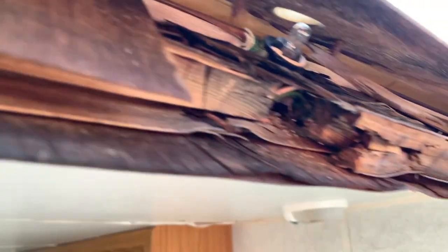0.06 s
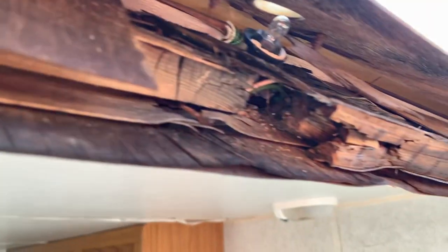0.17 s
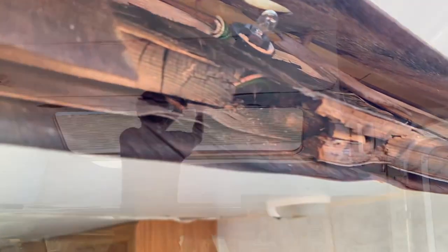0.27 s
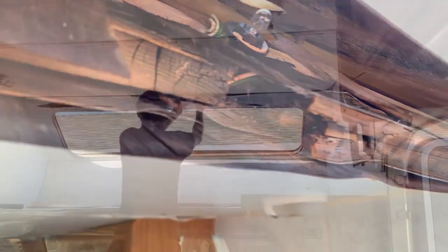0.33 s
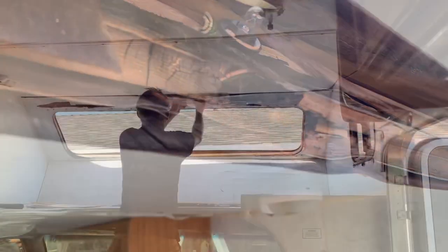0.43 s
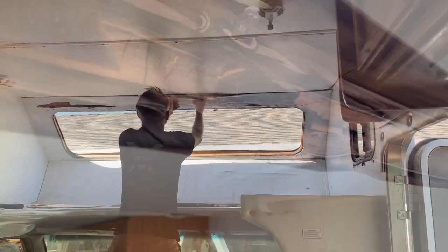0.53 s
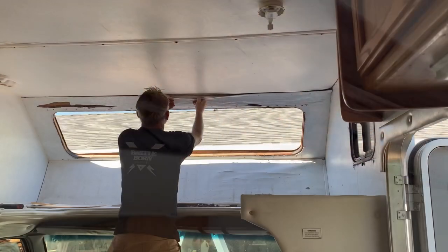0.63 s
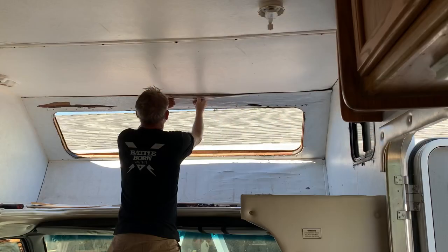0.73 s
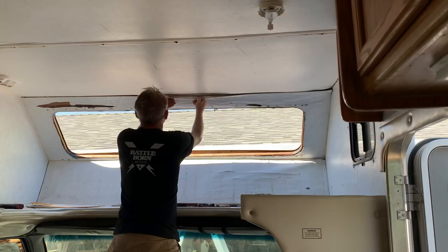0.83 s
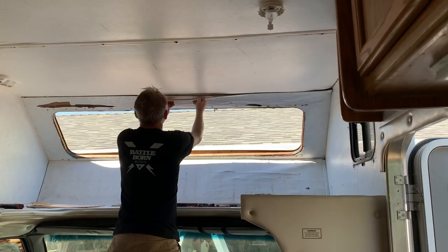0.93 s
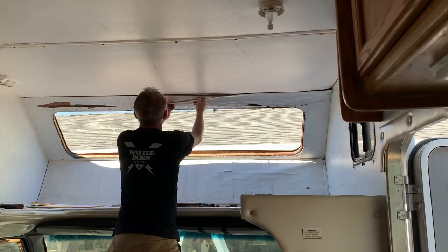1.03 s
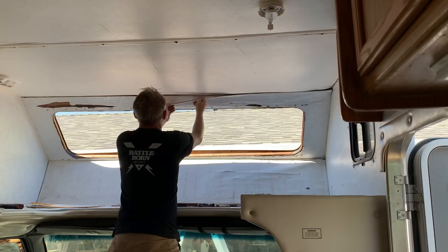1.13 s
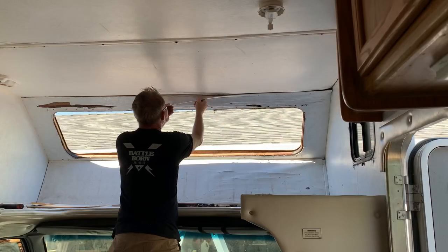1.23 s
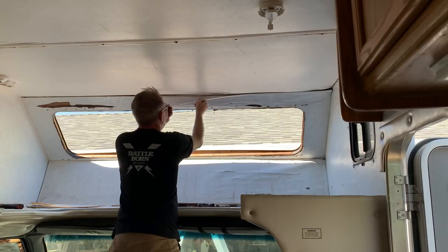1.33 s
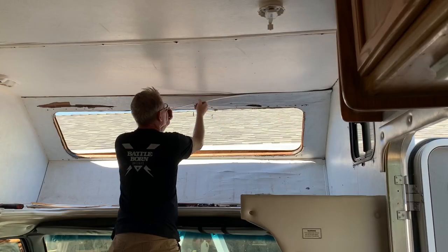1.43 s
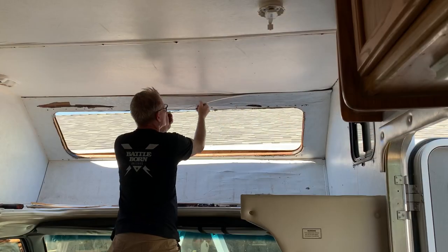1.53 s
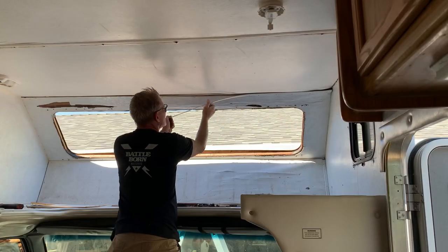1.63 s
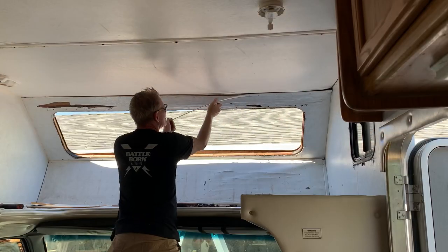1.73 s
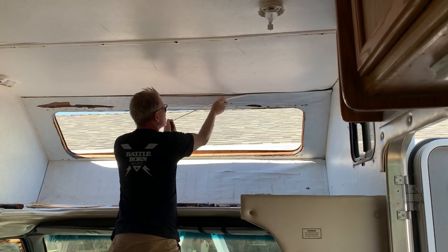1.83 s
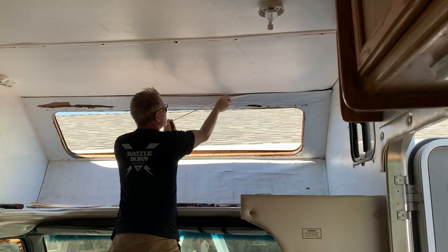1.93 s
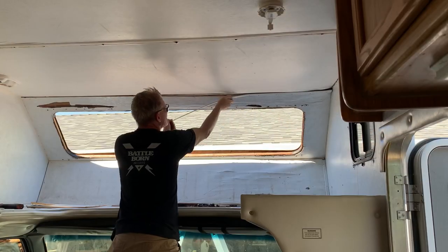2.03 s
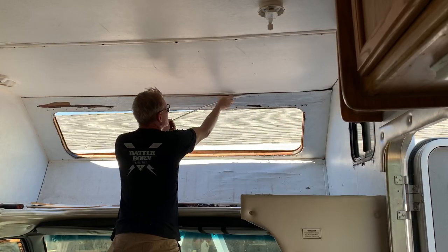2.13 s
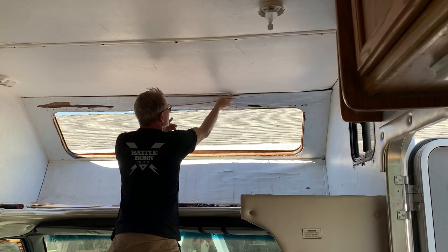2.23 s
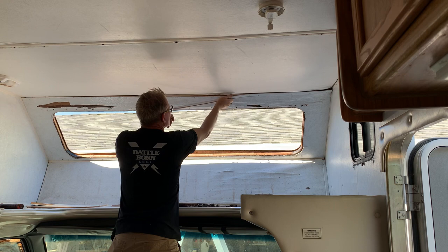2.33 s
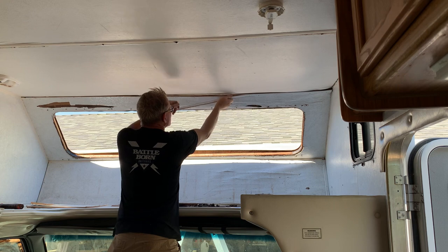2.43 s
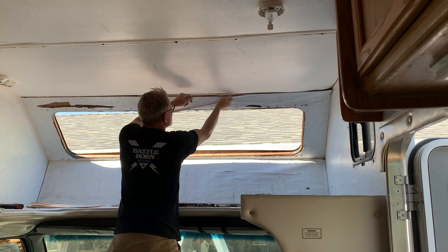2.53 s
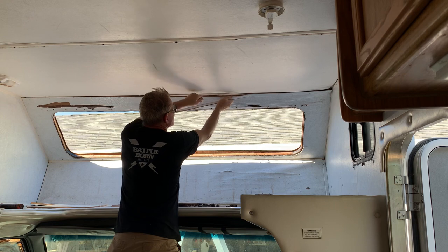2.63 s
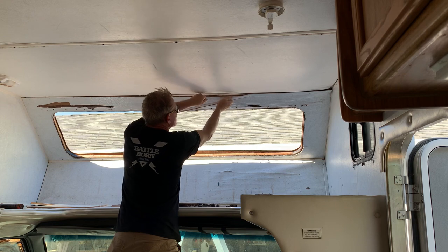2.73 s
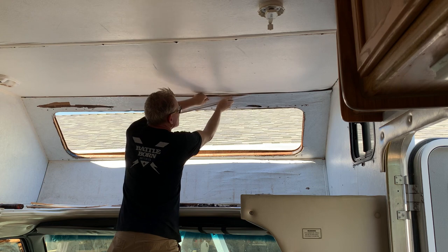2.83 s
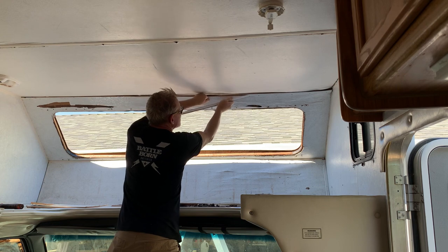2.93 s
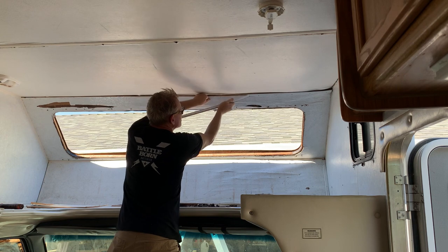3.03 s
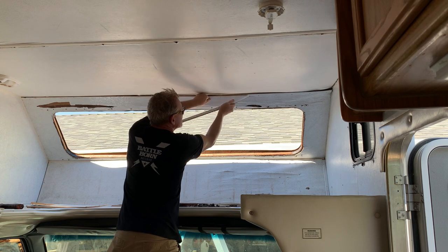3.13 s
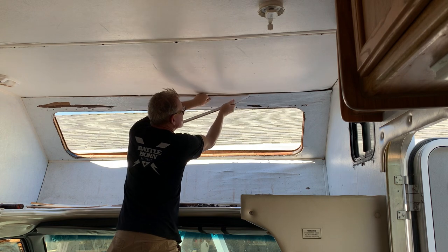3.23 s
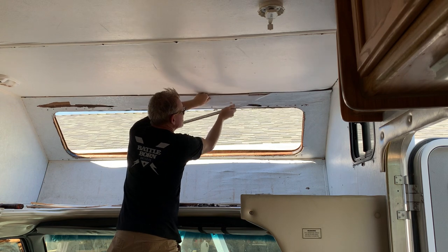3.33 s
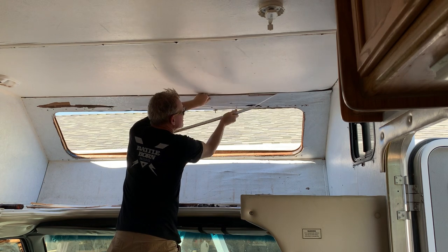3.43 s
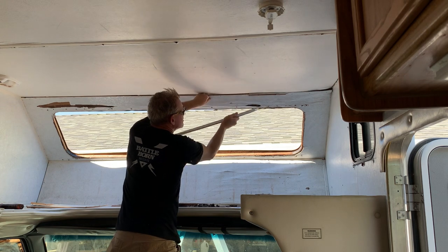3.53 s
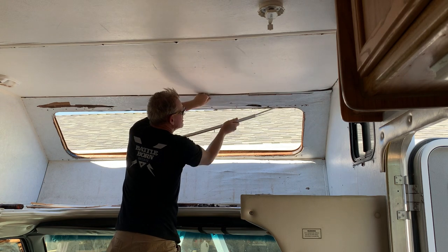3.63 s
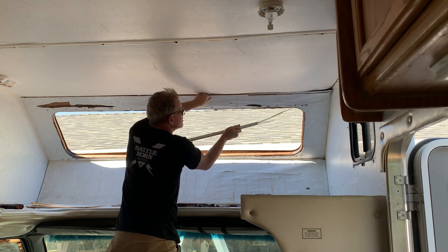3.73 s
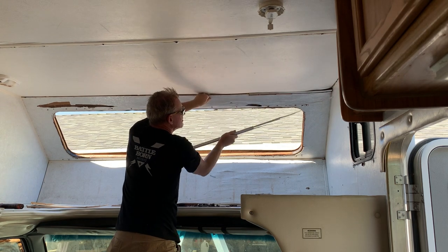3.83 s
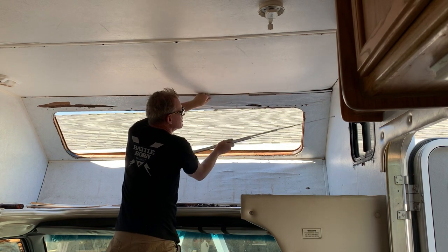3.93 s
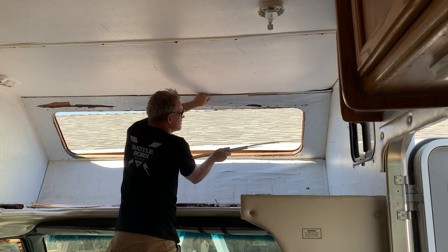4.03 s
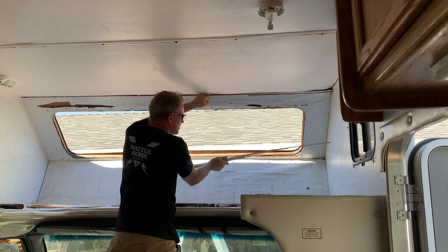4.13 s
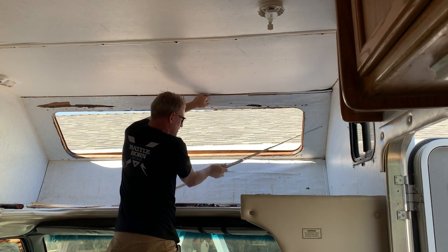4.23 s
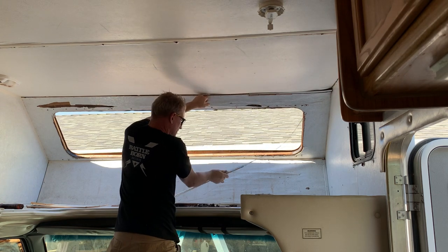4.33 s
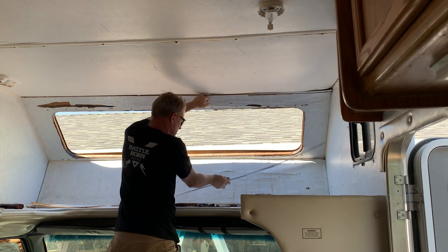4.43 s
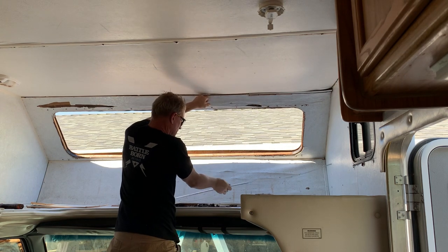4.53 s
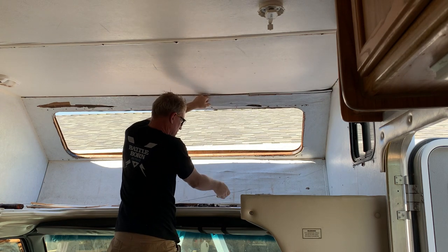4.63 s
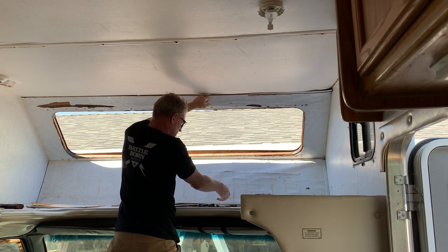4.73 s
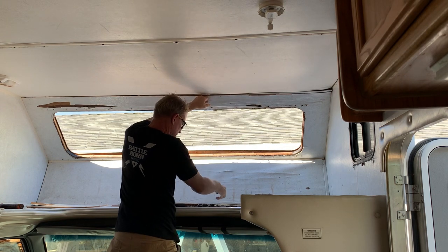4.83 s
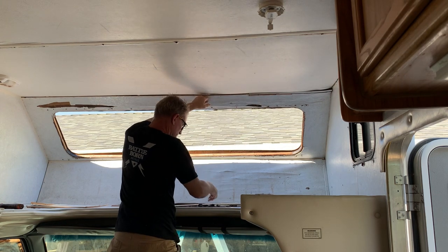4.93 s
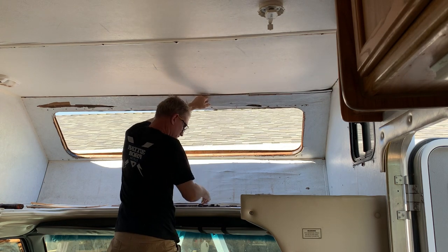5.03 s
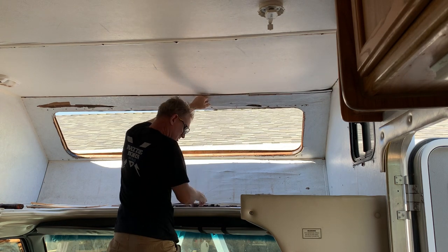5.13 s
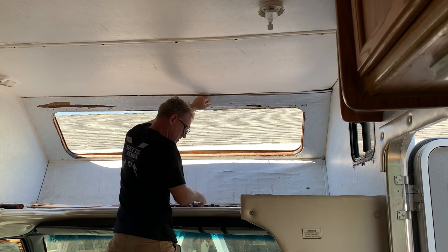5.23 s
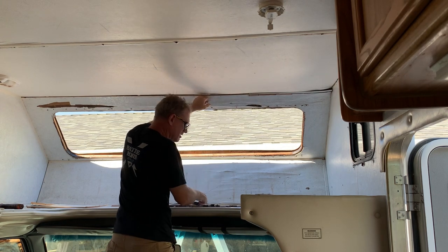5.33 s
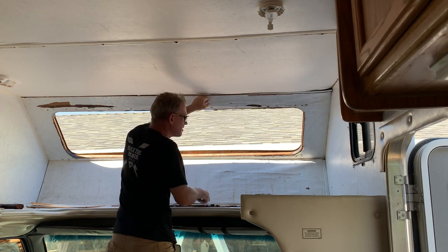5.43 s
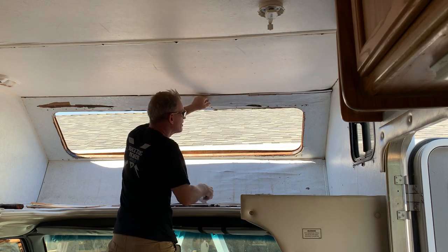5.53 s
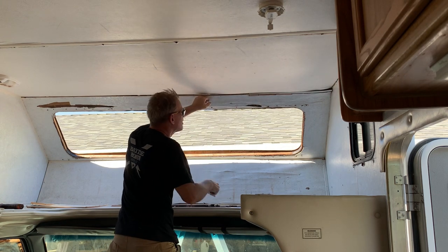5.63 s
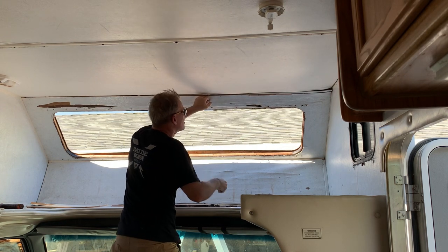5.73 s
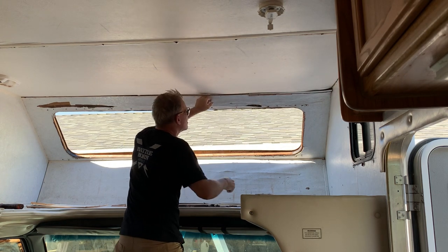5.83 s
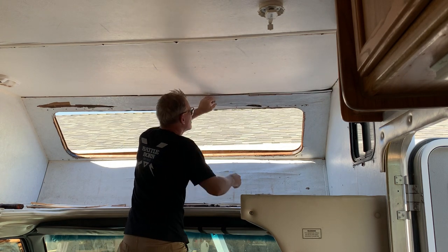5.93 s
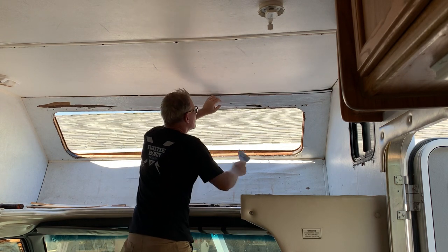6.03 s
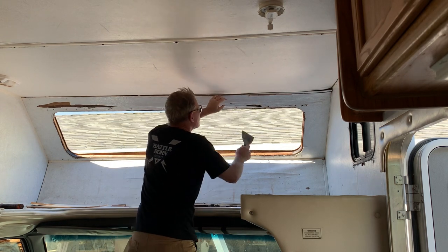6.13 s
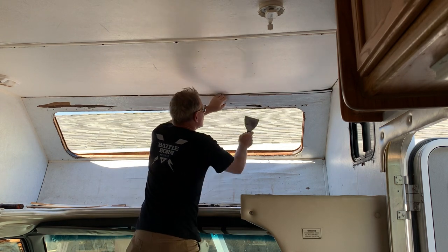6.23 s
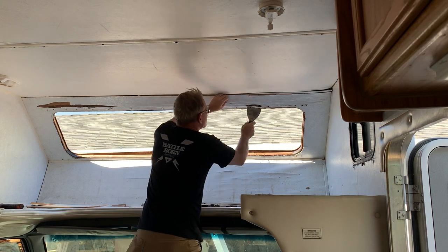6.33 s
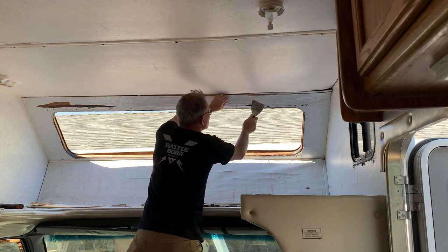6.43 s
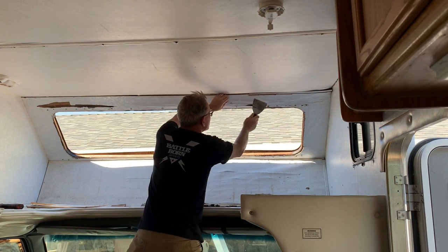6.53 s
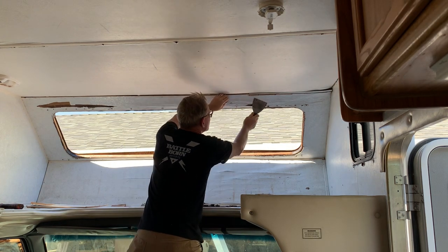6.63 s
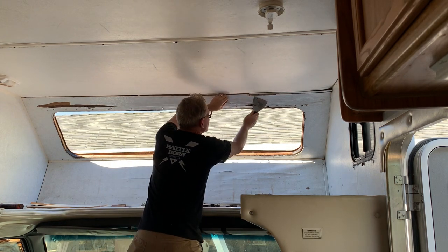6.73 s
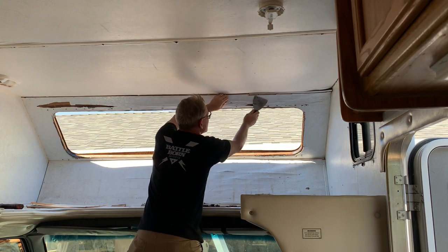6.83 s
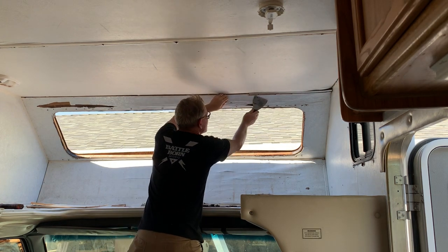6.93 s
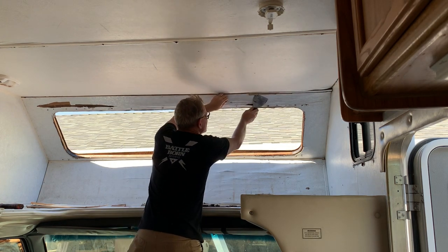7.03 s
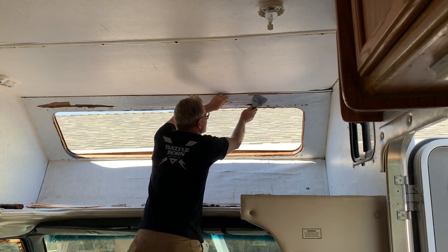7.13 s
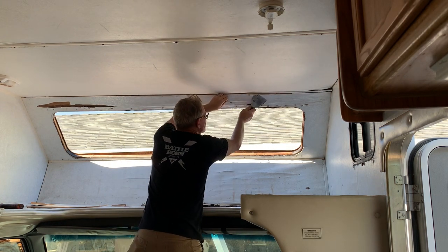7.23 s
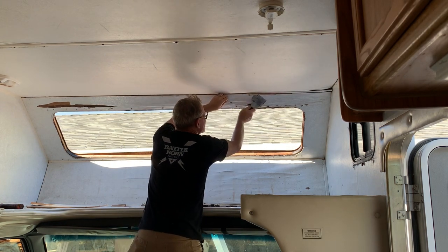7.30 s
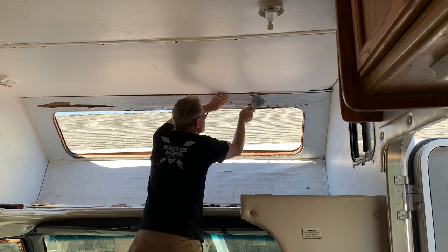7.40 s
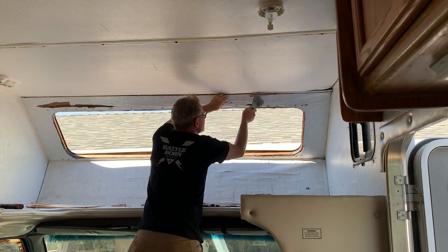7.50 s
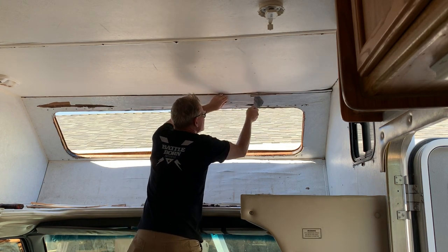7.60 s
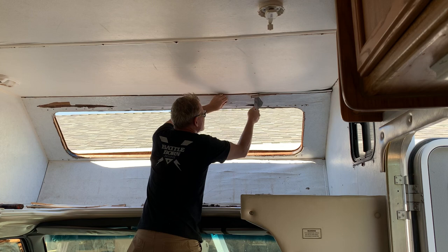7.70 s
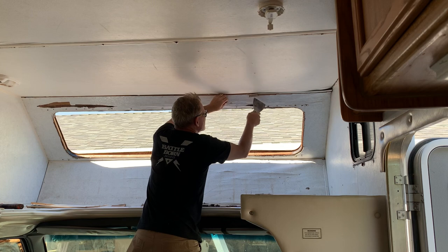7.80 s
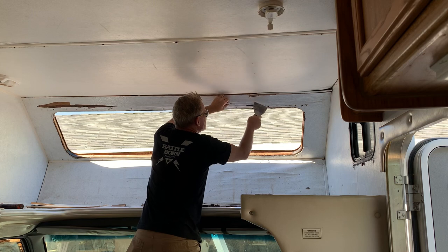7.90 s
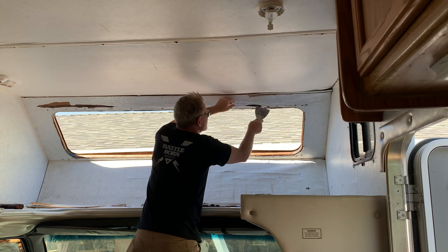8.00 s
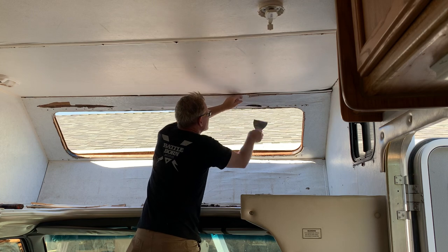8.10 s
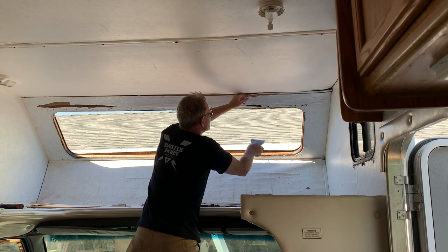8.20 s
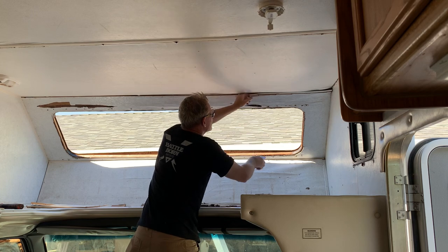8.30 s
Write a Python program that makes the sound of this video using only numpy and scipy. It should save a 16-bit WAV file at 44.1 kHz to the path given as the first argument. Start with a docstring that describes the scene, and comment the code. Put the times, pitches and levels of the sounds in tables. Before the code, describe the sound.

A small camper cabin with short, dry reverberation and a very faint outdoor hush; the work is a few metres away. A soft rubbing and fading sizzle open, with a tiny tick at 0.3 s and a dry low blip at 0.5. At 0.87 a sharp splintering crack jumps out with a hollow boom. Quiet rubbing, small ticks and a light knock follow until 2.9. At 3.0 comes the brightest, loudest snap, then from 3.25 to 3.8 crunchy tearing in uneven bursts, the roof panel booming deeply. From 3.9 to 5.0 the loose strip knocks and clatters lightly, with a barely audible squeak near 4.5. Around 5.1-5.4 a blade scrapes briefly. Near quiet lasts until 6.4; rubbing and hollow bumps grow to 7.05. From 7.3 to 7.75 softer crackling prying bursts with low thuds, then a light knock and fading rub to 8.4.

```python
"""Tearing rotten wood out of a camper van

Rotten wooden framing is torn from the ceiling, a few metres from the microphone. Random trains of snaps, shaped
by spectra and damped modes, make fibres that break singly and in runs; the roof panel booms when it lets go.
The loose strip is laid on a shelf, a putty knife is slid off it and pries out more wood. Hands and blade rub
along the frame; a dry blip, a squeak, a sizzle and a faint hush join in. The small cabin rings briefly."""
import sys
import numpy as np
from scipy import signal
from scipy.fft import rfft, irfft
from scipy.io import wavfile
from scipy.ndimage import uniform_filter1d

SR = 44100
rng = np.random.default_rng(int(sys.argv[2]) if len(sys.argv) > 2 else 0)


def wav_out(sig):
    """Save sig, one row per channel (or a flat mono array), as 16-bit PCM at SR to the path in sys.argv[1]."""
    wavfile.write(sys.argv[1], SR, np.round(np.clip(np.atleast_2d(sig).T, -1, 1) * 32767).astype(np.int16))


N = 368676
TIME = np.arange(N) / SR

# Event levels are relative: each layer trims them again.
# splintering cracks, with a sharp tick of the strip (at 4.811 s) and a click of the knife (at 5.225 s):
# start_s, treble_db, wood_body_db
CRACKS = [(0.2941, -47, -57), (0.784, -55, -43), (0.8606, -24.5, -30.5), (0.8716, -21, -27),
          (0.879, -15.5, -24.5), (1.274, -43.5, -46), (1.486, -59, -74.5), (1.947, -59.5, -78.5),
          (2.2506, -47, -53), (2.7291, -50, -67), (2.9573, -25.5, -47.5), (2.9965, -9, -27.5),
          (3.149, -44.5, -58), (3.253, -20.5, -34.5), (3.2629, -25, -26.5), (3.4865, -36, -50),
          (3.612, -36.5, -40), (3.6752, -25, -40), (3.7431, -23.5, -32.5), (4.061, -46.5, -66),
          (4.2416, -53, -67), (4.811, -38, -58), (5.225, -55.5, -64), (6.6733, -51, -73),
          (7.3448, -28.5, -36.5), (7.3668, -20.5, -46), (7.466, -30, -60), (7.493, -25, -32.5),
          (7.5753, -33.5, -65), (7.608, -27.5, -48), (7.6315, -30.5, -45)]
# steady tearing pulls: start_s, length_s, fibre_db, wood_body_db, sag_db_per_s
TEARS = [(0.872, 0.037, -25, -38.5, 178), (2.93, 0.068, -43, -51.5, -140), (3.255, .15, -23, -35.5, 63),
         (3.5, 0.19, -30, -39.5, -1.5), (3.746, 0.049, -61, -42, 127), (7.336, 0.14, -38.5, -47.5, 48),
         (7.5, 0.25, -36, -44, 153), (7.725, 0.024, -46.5, -43, 64)]
# knocks of the strip and the knife: start_s, ring_db, tick_db, hollow_thud_db, ring_centre_hz
KNOCKS = [(0.617, -79, -78, -46, 517), (1.808, -41, -43, -63.5, 970), (3.939, -45.5, -50.5, -95, 1040),
          (4.281, -39, -53, -39.5, 830), (4.606, -57.5, -76, -52.5, 764), (4.722, -46.5, -56.5, -51.5, 993),
          (4.781, -32.5, -61, -72, 720), (4.811, -39.5, -68, -56, 1070), (4.865, -46, -62, -63, 1220),
          (4.923, -44.5, -65.5, -53, 840), (5.065, -49, -78, -57.5, 750), (6.597, -47.5, -63, -60, 1230),
          (7.829, -47.5, -63.5, -61.5, 1050)]
# pushes of the knife over the shelf: start_s, length_s, ring_db, scratch_db, sag_db_per_s
SLIDES = [(5.07, 0.028, -56, -67.5, 0), (5.145, 0.012, -52.5, -64, 2), (5.226, 0.15, -55.5, -57, 26)]
# hands and blade rubbing along the frame: hardest_moment_s, swell_s, fade_s (each over 20 dB), friction_db, grit_db
RUBS = [(0.005, 0.04, 0.017, -52, -71), (0.23, 0.18, 0.45, -66, -67.5), (0.4, 0.066, 0.088, -76, -81),
        (0.51, 0.022, 0.056, -79.5, -63), (0.58, 0.027, 0.18, -64, -66), (0.78, 0.078, .05, -65, -56.5),
        (1.169, 0.22, 0.18, -66, -64), (1.29, 0.12, 0.099, -51.5, -60), (2.254, 0.12, 0.15, -56, -58),
        (2.82, 0.092, 0.073, -58.5, -60), (3.87, 0.056, 0.36, -64, -61), (4.13, .1, 0.055, -69, -71.5),
        (4.289, 0.031, 0.059, -50, -59), (4.76, 0.053, 0.19, -50.5, -50), (6.41, 0.15, 0.064, -59, -58.5),
        (6.779, 0.21, 0.029, -53.5, -59), (7.05, 0.16, 0.095, -46, -52), (7.87, .1, 0.13, -61.5, -70),
        (8.14, 0.022, 0.27, -66.5, -65.5)]
# shoves that set the roof panel booming: start_s, level_db
BOOMS = [(0.899, -23), (1.293, -49), (2.258, -51), (2.892, -50), (3.019, -39), (3.267, -18.5),
         (3.336, -22.5), (3.609, -24.5), (3.752, -25), (4.281, -39), (4.761, -41.5), (4.939, -47.5),
         (6.255, -48), (6.795, -36.5), (7.017, -28.5), (7.392, -34.5), (7.498, -22.5), (7.81, -45)]
# the worker's weight shifts and the van's shell rumbles: start_s, length_s, level_db, sag_db_per_s
LEANS = [(0.0, .75, -57.5, 6), (1.0, 0.11, -57.5, 17), (2.3, .85, -59.5, -7.5), (5.05, 0.25, -61, 9),
         (6.3, 0.5, -65, 0.5), (8.25, .11, -61, -0.5)]

# resonances of the beam behind the fibres: pitch_hz, width_hz, level_db
BEAM = [(254, 38, -1), (330, 16, -3.5), (505, 25, -2.5), (509, 57, -1), (1000, 37, -2.5), (1187, 19, 0),
        (1990, 70, -13.5), (2371, 100, 4)]
# resonances of the loose wooden strip: pitch_hz, width_hz, level_db
STRIP = [(693, 17, -8.5), (819, 63, -1.5), (987, 51, 0.5), (1222, 110, -1.5), (1472, 170, 1),
         (2140, 540, -1.5), (2290, 8.2, -23.5)]
# resonances of the knife blade: pitch_hz, width_hz, level_db
KNIFE = [(779, 28, -1.5), (1010, 42, -3.5), (1253, 140, -2), (2374, 3000, -10.5), (4260, 210, -4.5),
         (4840, 790, -4)]
# resonances of the roof panel: pitch_hz, width_hz, level_db
PANEL = [(57.4, 3.6, -0.5), (84.4, 33, 0), (103.14, 9.9, -7.5), (118.4, 3.8, -5.5), (143, 23, -4.5),
         (195, 40, -10), (264, 53, -7.5)]

# spectrum of snapping fibres: frequency_hz, relative_level_db
FIBRE = [(300, -26), (1500, -6.5), (3100, -8), (4800, -5), (6600, -3.5), (7700, -6), (9000, 1.5),
         (10500, -4), (12500, -4.5), (16000, -6.5)]
# spectrum of the wood body: frequency_hz, relative_level_db
WOOD = [(70, -20), (130, -3.5), (230, -5), (370, -4), (570, 5.5), (780, -2.5), (1300, -1), (2300, -6.5),
        (3200, -7), (6000, -18), (16000, -45)]
# spectrum of a hollow thud: frequency_hz, relative_level_db
THUD = [(50, -21.5), (120, -4), (230, 0), (380, -15), (560, 2), (800, -14.5), (4000, -49)]
# spectrum of the blade scratching the shelf: frequency_hz, relative_level_db
SCRATCH = [(700, -31), (2500, 0), (5000, -4.5), (7500, -10), (10000, -4), (14500, -8), (16000, -4)]
# spectrum of rubbing friction: frequency_hz, relative_level_db
FRICTION = [(60, -7.5), (150, 5), (300, -4), (600, -2.5), (1200, 0), (2200, -16), (5000, -23), (16000, -40)]
# spectrum of crumbling grit and hard ticks: frequency_hz, relative_level_db
GRIT = [(500, -16.5), (2000, 2), (4200, 0.5), (7000, -4), (11000, -9), (16000, -12)]
# spectrum of the outdoor hush: frequency_hz, relative_level_db
AMBIENCE = [(20, -9), (45, 2), (65, -8.5), (110, -6), (170, -16.5), (400, -20), (1200, -20.5), (3000, -29),
            (8000, -33), (16000, -34.5)]
# cabin reverberation: frequency_hz, t60_s
CABIN = [(150, 0.23), (700, 0.17), (2000, 0.19), (5000, 0.21), (13000, 0.17)]

RUN_S, BIG_RUN_S = 0.0042, 0.02  # decay of the snaps after a tiny crack, and what a 0 dB break adds to it
PULL_ATTACK_S, PULL_RELEASE_S = 0.027, 0.027  # a pull comes up and dies away by 20 dB in these times
TOP_HZ = 15700  # the sound is cut above this


def splintering(tearing, crack_db=-4, crack_body_db=-3, tear_db=-3, tear_body_db=-2, beam_db=-4):
    """Fibres (and two sharp clicks) snap brightly and ring the beam; in a tear they give way bundle by bundle."""
    start_s, treble_db, body_db = np.transpose(CRACKS)
    run_s = RUN_S + BIG_RUN_S * undb(treble_db)  # bigger breaks run on for longer
    fibre_gain, body_gain = tearing

    # the strength of the bundles drifts at random from one 9 ms point to the next
    knots = np.arange(0, N / SR, 0.009)
    bundles = undb(np.interp(TIME, knots, rng.uniform(-5.95, 4.55, len(knots))))
    fine = snaps(rate=1500, spread_db=5, even_s=0.02) * bundles * fibre_gain
    coarse = snaps(rate=500, spread_db=5, even_s=0.025) * bundles * body_gain

    fibres = bursts(start_s, treble_db + crack_db, run_s, rate=3800, first=0.42)
    fibres = fibres + undb(tear_db) * fine
    body = bursts(start_s, body_db + crack_body_db, run_s * 0.9, rate=2500, first=0.2)
    body = body + undb(tear_body_db) * coarse
    return colour(fibres, FIBRE) + colour(body, WOOD) + undb(beam_db) * ring(body, BEAM)


def knocking(ring_db=-2, tick_db=-3.5, thud_db=-1, chatter_s=0.0024, focus_db_per_octave=8, edge_db=-17):
    """The strip or the knife lands, chatters and thuds on the panelling; all knocks ring the strip's modes."""
    start_s, rings_db, ticks_db, thuds_db, centres_hz = np.transpose(KNOCKS)
    chatter = np.full(len(start_s), chatter_s)
    contacts = bursts(start_s, rings_db + ring_db, chatter, rate=1500, first=0.83)

    wood = 0
    for at, centre in zip(start_s, centres_hz):
        # the point that is struck favours the modes near one pitch
        modes = [(hz, width, db - focus_db_per_octave * abs(np.log2(hz / centre))) for hz, width, db in STRIP]
        this_knock = np.abs(TIME - at) < 0.015
        wood = wood + ring(contacts * this_knock, modes)

    ticks = bursts(start_s, ticks_db + tick_db, chatter, rate=3000, first=0.17)
    ticks = ticks + undb(edge_db) * contacts
    thuds = bursts(start_s, thuds_db + thud_db, chatter * 2, rate=4800, first=1)
    return wood + colour(ticks, GRIT) + colour(thuds, THUD)


def sliding_knife(ring_db=0, scratch_db=-1, rise_s=0.03, fall_s=0.069):
    """The knife is dragged off the shelf; small slips ring the blade and scratch the surface."""
    ring_gain, scratch_gain = pulls(SLIDES, rise_s, fall_s)
    slips = snaps(rate=700, spread_db=6, even_s=0.05)
    blade = ring(slips * ring_gain, KNIFE)
    scratch = colour(slips * scratch_gain, SCRATCH)
    return undb(ring_db) * blade + undb(scratch_db) * scratch


def rubbing(pressure, friction_db=-3, grit_db=-3, hollow_db=0, hard_db=-45, hollow_growth=0.96):
    """Stick-slip of hands and blade and crumbling grit; harder rubs bring in more of the hollow panel."""
    friction_gain, grit_gain = pressure
    hollow_gain = friction_gain * (friction_gain / undb(hard_db)) ** hollow_growth
    friction = colour(snaps(rate=700, spread_db=9.5) * friction_gain, FRICTION)
    grit = colour(snaps(rate=1800, spread_db=5) * grit_gain, GRIT)
    hollow = colour(snaps(rate=550, spread_db=5) * hollow_gain, THUD)
    return undb(friction_db) * friction + undb(grit_db) * grit + undb(hollow_db) * hollow


def roof(tearing, pressure, boom_db=-6, flex_db=-3, push_hz=260, side_db=-14):
    """The roof panel booms after each shove and rumbles as the shell flexes, nearly alike on both sides."""
    start_s, level_db = np.transpose(BOOMS)
    shoves = bursts(start_s, level_db + boom_db, np.full(len(start_s), 0.012), rate=1400, first=0.79)
    booms = filtered(ring(shoves, PANEL), push_hz, "low")

    rumble = filtered(rng.standard_normal((2, N)), [50.4, 84.49], "band")
    rumble = rumble / np.sqrt(uniform_filter1d(rumble ** 2, SR // 8))  # even out its loudness
    mid, side = rumble * undb(flex_db) * flexing(shoves, tearing, pressure)
    return booms + mid + undb(side_db) * np.outer([1, -1], side)


def flexing(shoves, tearing, pressure, shove_db=3, tear_db=0, rub_db=1, rest_db=-69, settle_s=0.041, lean_s=0.4):
    """Shoves, tears and rubs load the shell, which settles after them; shifting weight adds to the flexing."""
    load = (undb(shove_db) * shoves) ** 2
    load = load + (undb(tear_db) * tearing[1]) ** 2 + (undb(rub_db) * pressure[0]) ** 2
    keep = np.exp(-1 / (settle_s * SR))
    settling = signal.lfilter([1 - keep], [1, -keep], load)
    leaning = pulls(LEANS, lean_s, lean_s)[0]
    return np.sqrt(settling + leaning ** 2 + undb(rest_db) ** 2)


def blip(db=-40, start_s=0.4985, start_hz=1600, end_hz=80, fall_s=0.003, attack_s=0.0024, decay_s=0.027):
    """A short dry sine blip that drops quickly in pitch."""
    t = np.maximum(TIME - start_s, 0)
    hz = end_hz + (start_hz - end_hz) * np.exp(-t / fall_s)
    phase = 2 * np.pi * np.cumsum(hz * (t > 0)) / SR
    envelope = np.minimum(t / attack_s, 1) * np.exp(-(t / decay_s) ** 2)
    return undb(db) * np.sin(phase) * envelope


def faint_tones(squeak_db=-76, squeak_hz=1860, sizzle_db=-71, sizzle_hz=3800):
    """Noise through single modes: a thin squeak as the strip is lowered, a soft sizzle fading at the start."""
    squeak_gain = swell(4.48, 0.15, rise_s=0.06, fall_s=0.06, sag_db_per_s=25)
    sizzle_gain = swell(0, 0.2, rise_s=0.01, fall_s=0.15)
    squeak = ring(rng.standard_normal(N) * squeak_gain, [(squeak_hz, 20, 0)])
    sizzle = ring(rng.standard_normal(N) * sizzle_gain, [(sizzle_hz, 900, 0)])
    return undb(squeak_db) * squeak + undb(sizzle_db) * sizzle


def outdoor_hush(level_db=-72):
    """Steady noise, strongest in the bass, as a faint outdoor hush."""
    return undb(level_db) * colour(rng.standard_normal(N), AMBIENCE)


def cabin(x, count=6, wander_hz=2.3):
    """The break wanders along the frame: the sound circles through several random reflection patterns."""
    turn = wander_hz * TIME + np.arange(count)[:, None] / count
    distance = np.minimum(np.abs(turn % 1 - 0.5) * count, 1)
    nearness = np.cos(np.pi / 2 * distance)  # equal-power crossfade between neighbouring places
    return sum(signal.oaconvolve((x * near)[None], cabin_response(), axes=1)[:, :N] for near in nearness)


def cabin_response(direct_db=-13, bright_db=-5, bright_hz=6500, scatter_s=0.0012,
                   ceiling_db=-9, ceiling_s=0.0076, apart_hz=400, build_s=0.00084):
    """Treble-rich direct sound, a ceiling bounce and a dense tail that is alike on both sides only in the bass."""
    t = TIME[:SR // 2]
    hz = np.fft.rfftfreq(len(t), 1 / SR)
    mid, side = rfft(rng.standard_normal((2, len(t))))
    angle = np.pi / 3.6 * hz ** 2 / (hz ** 2 + apart_hz ** 2)
    field = mid * np.cos(angle) + np.outer([1, -1], side * np.sin(angle))

    # each half-octave band dies away at its own rate
    band = np.round(2 * np.log2(np.maximum(hz, 100)))
    tail = 0
    for b in np.unique(band):
        decay = np.exp(-np.log(1000) * t / along(2 ** (b / 2), CABIN))
        tail = tail + irfft(field * (band == b), len(t)) * decay
    tail = unit(tail * (1 - np.exp(-t / build_s)))

    # scattering off the nearby frame smears the first arrival with little colouring: only phases are random
    scatter = rfft(rng.standard_normal(len(t)) * np.exp(-t / scatter_s))
    click = irfft(np.exp(1j * np.angle(scatter)), len(t)) * (t < 0.004)
    direct = undb(direct_db) * click + undb(bright_db) * filtered(click, bright_hz, "high")
    bounce = undb(ceiling_db) * np.roll(direct, int(ceiling_s * SR))
    return tail + direct + bounce


def swell(start_s, length_s, rise_s, fall_s, sag_db_per_s=0):
    """Gain of one movement: it swells, holds while it sags, and fades; rise and fall span 20 dB."""
    t = TIME - start_s
    before = np.maximum(-t, 0) / max(rise_s, 0.002)
    after = np.maximum(t - length_s, 0) / max(fall_s, 0.002)
    sag_db = sag_db_per_s * np.clip(t, 0, length_s)
    return undb(np.maximum(-20 * (before + after) - sag_db, -200))


def pulls(rows, rise_s, fall_s):
    """Summed movement gains, one for each level column of rows (start_s, length_s, levels_db, sag_db_per_s)."""
    return sum(np.outer(undb(levels_db), swell(start_s, length_s, rise_s, fall_s, sag))
               for start_s, length_s, *levels_db, sag in rows)


def rub_pressure():
    """Gains of friction and grit: each rub swells to its hardest moment and fades."""
    return sum(np.outer(undb(levels_db), swell(at, 0, rise_s, fall_s)) for at, rise_s, fall_s, *levels_db in RUBS)


def snaps(rate, spread_db, even_s=0.054):
    """Random snaps (rate per second), mostly small and a few large, evened towards a mean power of one."""
    sizes = undb(spread_db * np.minimum(rng.exponential(size=N), 5)) * rng.choice([-1, 1], N)
    x = sizes * (rng.random(N) < rate / SR)
    return x / np.sqrt(np.abs(uniform_filter1d(x ** 2, int(even_s * SR))) + 1e-4)


def bursts(times, levels_db, lengths_s, rate, first=0.5, lead_db=-7, lead_slope=0.95, lead_s=0.018):
    """Each blow is a brief lead-in, a main snap and a dying run of smaller ones; its level is taken over 15 ms."""
    out, grains = np.zeros(N + SR), snaps(rate, 5)
    before = SR // 20  # room for the lead-in
    t = TIME[:SR // 5] - before / SR
    for at, db, length_s in zip(times, levels_db, lengths_s):
        i = int(at * SR) - before
        lead = undb(lead_db + lead_slope * db)  # relative to the run: louder blows have a stronger lead-in
        dying = np.exp(-np.abs(t) / max(length_s, 0.001))
        envelope = np.where(t > 0, dying, lead * np.exp(-np.abs(t) / lead_s))
        run = unit(np.roll(grains, -i)[:len(t)] * envelope + 1e-9)
        run[before] += first  # the main snap
        out[i:i + len(t)] += unit(run) * undb(db) * np.sqrt(0.015 * SR)
    return out[:N]


def ring(x, modes):
    """Drive a set of damped modes, with unit power gain; wider modes die away faster."""
    t = TIME[:SR // 2]
    response = 0
    for k, (hz, width, db) in enumerate(modes):
        mode = unit(np.exp(-np.pi * width * t) * np.sin(2 * np.pi * hz * t))
        response = response + (-1) ** k * undb(db) * mode
    return signal.oaconvolve(x, unit(response))[:N]


def colour(x, points, size=4096):
    """Causal minimum-phase filter with the given spectrum and unit power gain."""
    cepstrum = irfft(along(np.fft.rfftfreq(size, 1 / SR), points) * np.log(10) / 20)
    # folding the cepstrum forward gathers the energy at the onset
    cepstrum[1:size // 2] *= 2
    cepstrum[size // 2 + 1:] = 0
    return signal.oaconvolve(x, unit(irfft(np.exp(rfft(cepstrum)))))[:N]


def filtered(x, hz, kind):
    """Second-order Butterworth design: low, high or band pass."""
    return signal.sosfilt(signal.butter(2, hz, kind, fs=SR, output="sos"), x)


def along(hz, points):
    """Read (frequency_hz, value) points on a log-frequency axis."""
    f, value = np.transpose(points)
    return np.interp(np.log(hz + 1), np.log(f), value)


def unit(x):
    """Scale a response to unit energy."""
    return x / np.sqrt(np.sum(x ** 2, axis=-1, keepdims=True))


def undb(db):
    """Decibels to gain."""
    return 10 ** (np.asarray(db) / 20)


def scene():
    """Work, faint tones and hush pass through the cabin; the roof and the dry blip are added directly."""
    tearing = pulls(TEARS, PULL_ATTACK_S, PULL_RELEASE_S)
    pressure = rub_pressure()
    work = splintering(tearing) + knocking() + sliding_knife() + rubbing(pressure)
    inside = cabin(work + faint_tones() + outdoor_hush())
    return inside + roof(tearing, pressure) + blip()


def record(dry, wide_hz=7200, mid_db=1.36, side_db=-1, low_cut_hz=36):
    """A stereo widening swings the treble between mid and side with frequency; deep bass and top are cut."""
    hz = np.fft.rfftfreq(N, 1 / SR)
    swing = np.pi * (hz - 11000) / 4750
    treble = np.clip((hz - wide_hz) / 1500 + 0.5, 0, 1)  # share of the swinging treble at each frequency
    left, right = rfft(filtered(dry, low_cut_hz, "high"))

    mid_gain = 1 - treble + treble * undb(mid_db) * np.abs(np.cos(swing))
    mid = (left + right) / 2 * mid_gain
    # the treble side signal is the left channel turned by a quarter cycle
    treble_side = 1j * left * treble * undb(side_db) * np.sin(swing)
    side = (left - right) / 2 * (1 - treble) + treble_side

    stereo = irfft(np.array([mid + side, mid - side]), N)
    return signal.sosfilt(signal.ellip(10, 0.2, 70, TOP_HZ, fs=SR, output="sos"), stereo)


dry = scene()
out = record(dry)
wav_out(out)
```